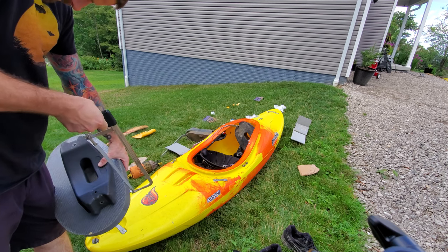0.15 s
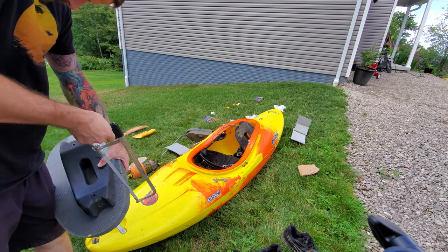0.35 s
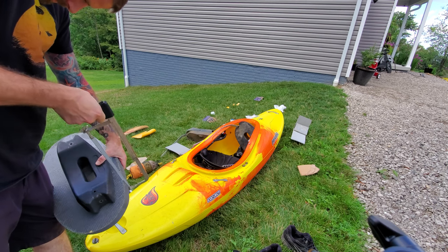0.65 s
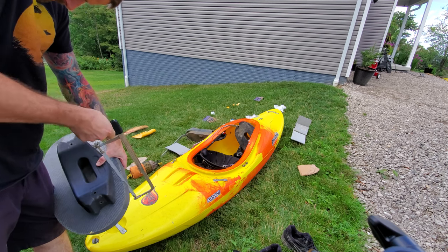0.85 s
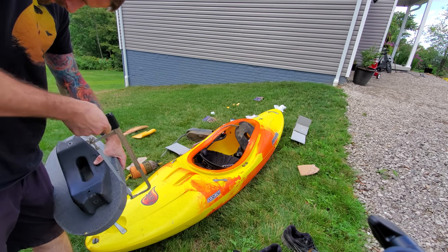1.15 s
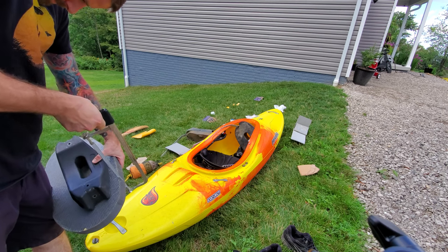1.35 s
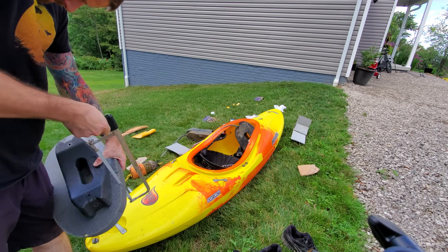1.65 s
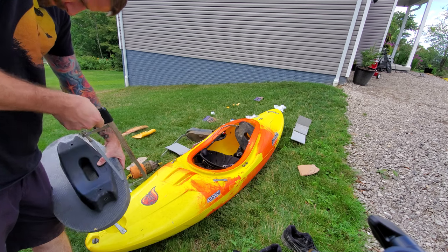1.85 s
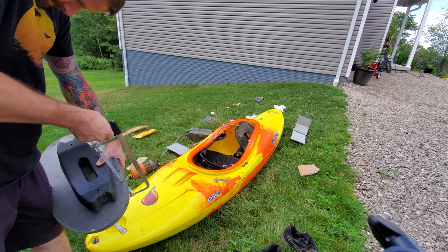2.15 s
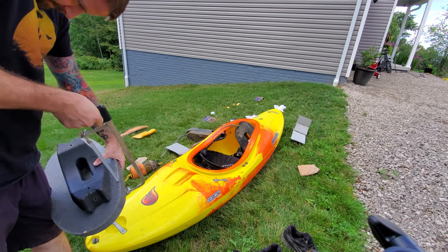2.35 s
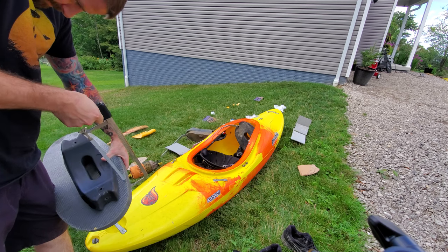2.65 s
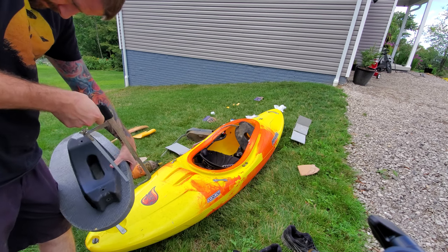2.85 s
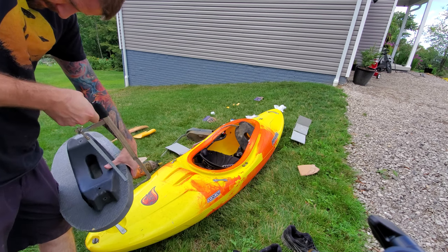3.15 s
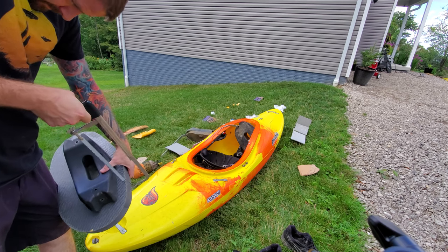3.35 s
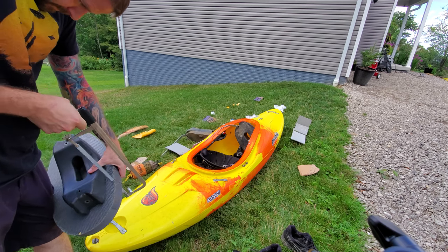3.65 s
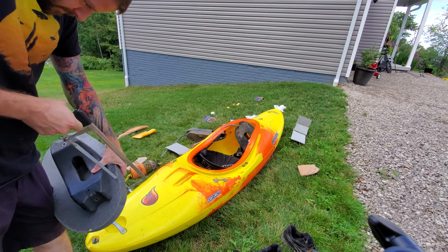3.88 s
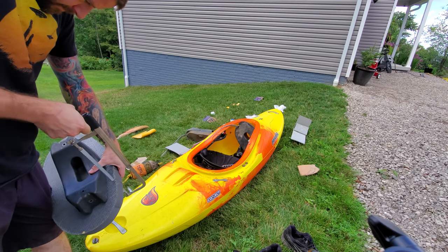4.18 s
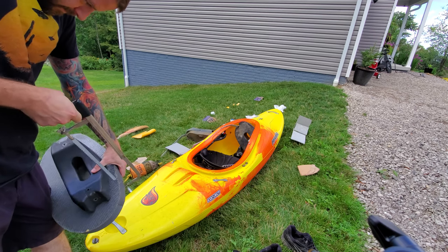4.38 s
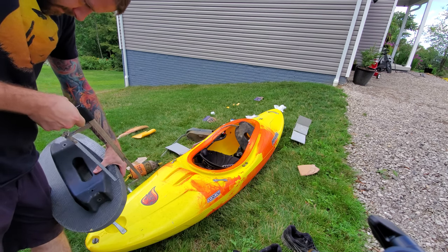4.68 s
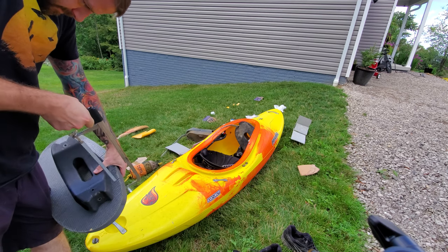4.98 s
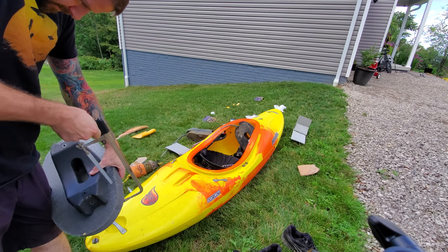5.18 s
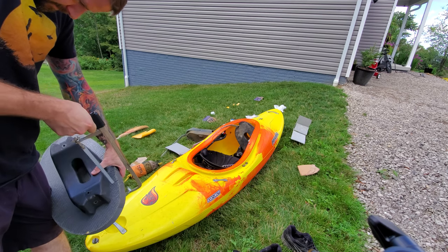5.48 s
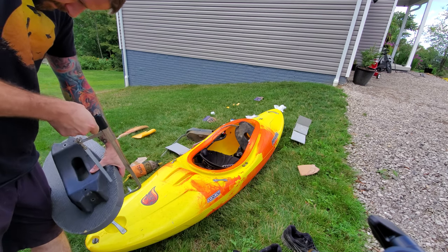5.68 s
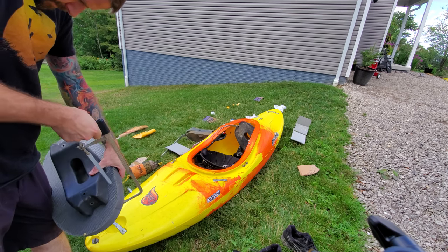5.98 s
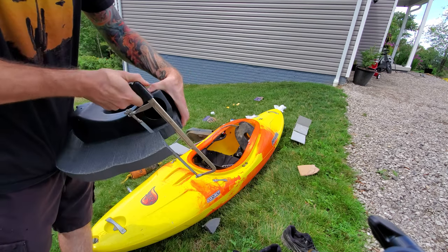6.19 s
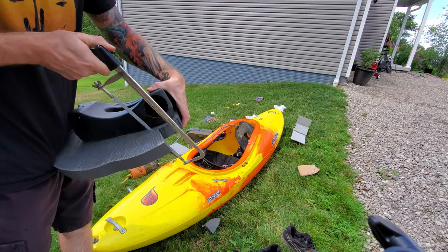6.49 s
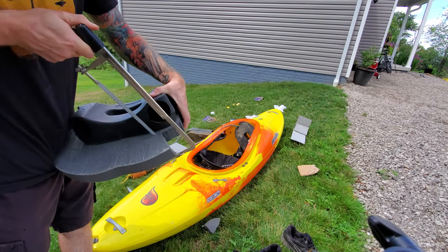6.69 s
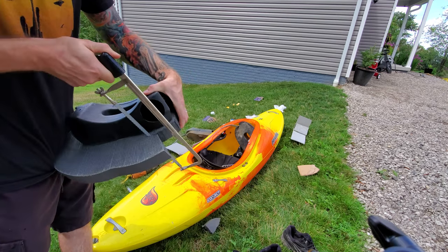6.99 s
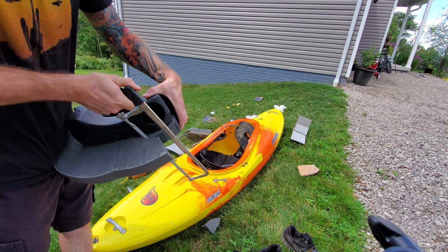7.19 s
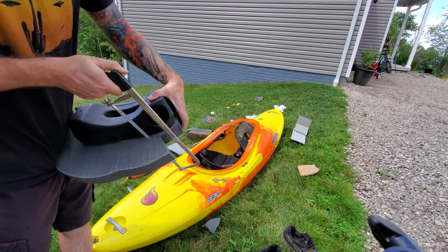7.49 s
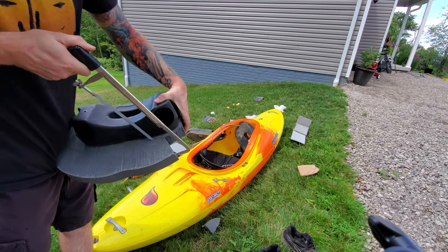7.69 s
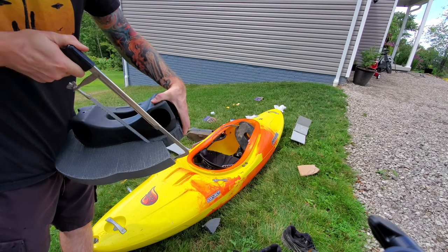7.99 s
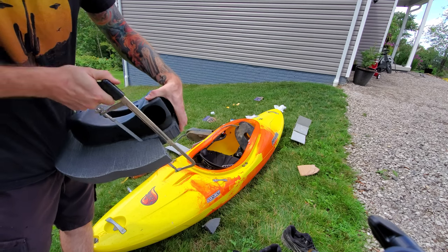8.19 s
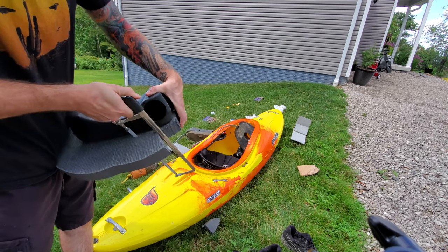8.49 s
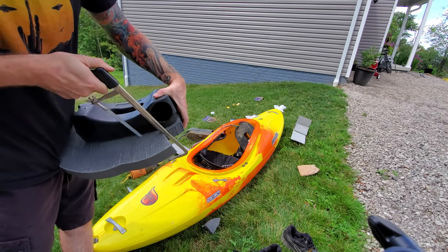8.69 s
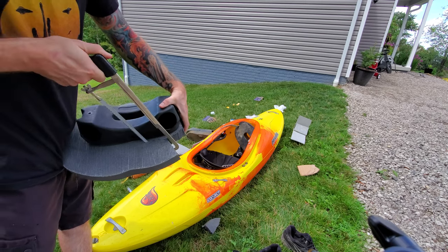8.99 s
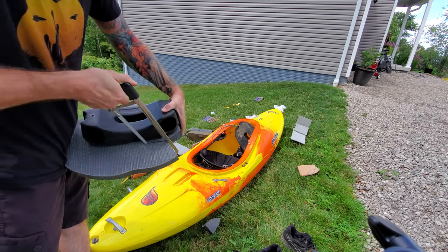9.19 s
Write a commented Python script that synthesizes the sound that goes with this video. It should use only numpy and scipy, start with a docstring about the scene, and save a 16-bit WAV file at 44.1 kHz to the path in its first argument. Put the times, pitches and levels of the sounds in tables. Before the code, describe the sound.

Outdoors, close by and a little to the left, a hacksaw rasps through hollow plastic in short, quick strokes that make the shell drum. It stops for about a second, then carries on with more hiss. The strokes turn uneven as the blade sticks, bringing sharp cracks, brief squeaks, short groans and a few dull thuds, and a hollow knock near the end. The air rumbles softly throughout.

```python
"""A hacksaw cuts a hollow plastic seat held in one hand, outdoors on a lawn.
Each tooth tears off a chip (a rasp) and plucks the shell (a drumming), faster mid-stroke and slower at
the turns. After a pause the cut goes on, deeper and hissier. Then the seat is turned, and the blade
jams, snaps free and squeaks while the seat groans and bumps. The open air rumbles softly underneath."""
import sys
import numpy as np
from scipy import signal
from scipy.io import wavfile

SR = 44100
rng = np.random.default_rng(int(sys.argv[2]) if len(sys.argv) > 2 else 0)


def generate_wav(signal):
    """Clip the signal to [-1, 1] and save it as 16-bit WAV at the path in sys.argv[1]."""
    frames = np.transpose(np.atleast_2d(signal))
    scaled = np.clip(frames, -1, 1) * 32767
    pcm = np.round(scaled).astype(np.int16)
    wavfile.write(sys.argv[1], SR, pcm)


N = 411894
FREQS = np.fft.rfftfreq(16384, 1 / SR)

# teeth that catch and break free: start_s, level_db, fade_s (time to die away by 60 dB)
SNAPS = [(0.289, -18, 0.01), (1.6125, -5, 0.0045), (2.017, -5.5, 0.006), (4.368, -19, 0.0036),
         (4.380, -3.5, 0.0031), (4.741, -12, 0.0031), (4.768, -5, 0.0081), (6.563, -16.5, 0.0057),
         (6.890, -13, 0.014), (7.002, -2.5, 0.0038), (7.0464, -2.5, 0.003), (7.1096, -1.5, 0.002),
         (7.147, -12.5, 0.0085), (7.185, -3.5, 0.013), (7.9255, -5, 0.0087), (8.012, -5, 0.0056),
         (8.060, -9, 0.0082), (8.1124, -8, 0.015), (8.133, -8.5, 0.01), (8.165, -4, 0.011),
         (8.1845, -6, 0.0091), (8.214, -6, 0.016), (8.23, -12, 0.0084), (8.255, -6.5, 0.0055),
         (8.277, -4.5, 0.014), (9.134, -17.5, 0.012), (9.196, -8, 0.022)]
# the shell's ringing notes, held three ways: pitch_hz, width_hz, level_db
SHELL_FIRST = [(337.4, 37, -0.5), (417.4, 23.3, 7), (507, 22.6, 8.5), (672, 43, 0.5), (916, 270, -5.5),
               (1494, 570, -9.5)]
SHELL_SECOND = [(419, 25, 2.5), (503.5, 45, 7), (685, 24, -7.5), (900, 160, -7), (1480, 340, -9)]
SHELL_TURNED = [(405.7, 52, 6.5), (1166, 94, 0), (1740, 430, -5.5)]
# tone of the rasp in a shallow and a deep cut: frequency_hz, level_db
RASP_SHALLOW = [(200, -30), (600, -5), (1650, 1), (2200, -2), (3200, 0), (6400, 0), (7700, -8),
                (10000, -4.5), (13000, .5)]
RASP_DEEP = [(200, -30), (600, -9.5), (1600, -5), (2300, -7), (3400, 3), (4700, -1.5), (6400, -.7),
             (7700, -11), (10000, -7), (13500, -1.5)]


def amp(db):
    return 10 ** (np.asarray(db) / 20)


def unit(x):
    return x / np.sqrt(np.mean(x ** 2) + 1e-20)


def add(mix, start_s, sound):
    part = mix[:, max(round(start_s * SR), 0):][:, :sound.shape[-1]]
    part += sound[..., :part.shape[1]]


def spectrum(points):
    """Join (frequency_hz, level_db) points into a gain for every frequency."""
    hz, db = np.transpose(points)
    return amp(np.interp(np.log(FREQS + 1), np.log(hz), db))


def colour(x, gain):
    """Shape the tone of x with a filter that rings only after it is struck."""
    log_gain = np.log(np.maximum(np.r_[gain, gain[-2:0:-1]], 1e-5))
    taps = np.fft.ifft(np.exp(np.conj(signal.hilbert(log_gain)))).real[:len(gain)]
    return signal.fftconvolve(x, taps / np.linalg.norm(taps))


def wander(n, hz):
    """A random wobble of size about 1 that changes hz times a second."""
    at = np.arange(n) * hz / SR
    return unit(np.interp(at, np.arange(n), rng.standard_normal(n)))


def burst(fade_s):
    """Noise that starts at once and dies away by 60 dB in fade_s."""
    t = np.arange(SR // 4) / SR
    return rng.standard_normal(len(t)) * amp(-60 * t / fade_s)


def air(swell_db=-3.0):
    """Open air: a low rumble, much alike on both sides, under a faint hiss that is not."""
    # tone of the air: frequency_hz, level_db
    tone = [(20, -26), (55, 6), (120, 1), (170, -8.5), (330, -22.5), (2500, -34.5), (3600, -29),
            (6500, -29), (8500, -36.5)]
    # loudness of the air: time_s, level_db
    loudness = [(5, -57.5), (8, -50.5)]
    common, left, right = rng.standard_normal((3, N))
    low_pass = signal.butter(1, 350, fs=SR)
    pair = [own + .7 * signal.lfilter(*low_pass, common - own) for own in (left, right)]
    level_db = np.interp(np.arange(N) / SR, *np.transpose(loudness)) + swell_db * wander(N, 8)
    return amp(level_db) * np.array([unit(colour(x, spectrum(tone))[:N]) for x in pair])


def shell_gain(shell, low_hz=290, high_hz=2000, drift=.04):
    """The shell's ringing notes, shifted a little by the grip each time; it is too small for bass."""
    shifts = 1 + drift * rng.standard_normal(len(shell))
    power = sum(amp(db) ** 2 / (1 + (2 * (FREQS - hz * shift) / width) ** 2)
                for (hz, width, db), shift in zip(shell, shifts))
    return np.sqrt(power / (1 + (low_hz / (FREQS + 1)) ** 16) / (1 + (FREQS / high_hz) ** 6))


def stroke(row, shell, rasp, run_in_s, fastest, drum_db, run_out_s=.057, crawl_hz=320.2, flex_hz=810,
           lurch=.05, slip=.42, smooth_db=-6, flex_db=-5, teeth_db=-14, octave_db=-17, zip_db=-3.5,
           catch_db=14.5, catches_per_s=60, speed_db=4):
    """One pass of the blade: each tooth tears a chip and plucks the shell."""
    start_s, length_s, tooth_hz, force_db, build_db, even = row
    n = int(length_s * SR)
    progress = np.arange(n) / n
    # the teeth bite only while they move; a stuck blade breaks loose at once
    if any(abs(snap_s - start_s) < .025 for snap_s, *_ in SNAPS):
        run_in_s = .012
    ramp = length_s * np.minimum(progress / run_in_s, (1 - progress) / run_out_s)
    moving = np.sin(np.pi / 2 * np.minimum(ramp, 1))
    push = moving * amp(force_db + build_db * (progress - .5))
    judder = unit(amp(1.5 * wander(n, 178.3)))
    # the arm speeds up and slows down; uneven tearing smears the teeth's note into noise
    swing = np.sin(np.pi * np.interp(progress, [0, fastest, 1], [0, .5, 1])) ** 3
    rate_hz = crawl_hz + (tooth_hz - crawl_hz) * swing
    jitter = 1 + lurch * wander(n, 35) + slip * (1 - even) * wander(n, 900)
    teeth_passed = np.cumsum(rate_hz * jitter) / SR
    note = np.cos(2 * np.pi * teeth_passed) + amp(octave_db) * np.cos(4 * np.pi * teeth_passed)
    teeth = unit(note * amp(2 * wander(n, 400.3)))
    grit = unit(amp(1.5 * wander(n, 1800)) * (0.8 + np.exp(-(teeth_passed % 1) / 0.28)))
    chips, left, right = grit * rng.standard_normal((3, n))
    # single chips crack off louder than the rest
    chips = chips + amp(catch_db) * rng.exponential(1, n) * (rng.random(n) < catches_per_s / SR)
    # teeth that ride cleanly pluck the shell less; it flutters in the grip
    flutter = unit(amp(1.7 * wander(n, 58.6)))
    pluck = push * moving * amp(drum_db + smooth_db * even) * flutter
    # the shell booms when the tooth rate sweeps through one of its notes
    drum = colour((amp(teeth_db) * even * teeth + chips) * pluck * judder, shell_gain(shell))
    drum *= np.linalg.norm(pluck) / np.linalg.norm(drum)
    # the seat's wall bends with the teeth late in a slow stroke; the blade zips at full speed
    flex = amp(drum_db + flex_db) * even * (progress / fastest) ** 2 * moving
    flex /= 1 + (tooth_hz / flex_hz) ** 8
    drum[:n] += (flex + amp(zip_db) * swing ** 3) * even * teeth * push * judder
    # no two strokes rasp quite alike
    rasp_gain = spectrum(rasp) * amp(2 * wander(len(FREQS), 290.7))
    swell = push * moving * judder * amp(speed_db * even * (swing - .5))
    # chips tear all along the cut, so left and right share only part of the hiss
    return drum + np.array([colour(unit(chips + own) * swell, rasp_gain) for own in (left, right)])


def snap(db, fade_s, cycles=95):
    """A tooth breaks free with a crack and a crumble; the quicker the break, the brighter it is."""
    # tone of cracking plastic: frequency_hz, level_db
    tone = [(180, -28), (450, -4), (1150, -4), (1900, -8.5), (3000, 6.5), (5000, -5.5), (6500, 2),
            (8000, -6.5), (14000, -3.5)]
    blow = burst(fade_s)
    blow[0] = 3  # the opening crack
    return amp(db) * colour(blow / 2, spectrum(tone) / np.hypot(1, FREQS * fade_s / cycles))


def slide(length_s, db, uneven_db=2):
    """The blade glides in the slot without biting: a faint hiss."""
    n = int(length_s * SR)
    rub = rng.standard_normal((2, n)) * amp(db + uneven_db * wander(n, 36)) * np.sqrt(np.hanning(n))
    return np.array([colour(x, spectrum(RASP_DEEP)) for x in rub])


def tick(db, fade_s=.048):
    """The blade touches the side of the slot."""
    return amp(db) * colour(burst(fade_s), spectrum(RASP_DEEP))


def squeak(db, fall_octaves, length_s=.028, end_hz=2910, octave_db=-5, chatter_db=3):
    """The pinched blade sticks and slips; the pitch falls as it slows."""
    n = int(length_s * SR)
    hz = end_hz * 2 ** np.linspace(fall_octaves, 0, n) * (1 + .12 * wander(n, 2000))
    phase = 2 * np.pi * np.cumsum(hz) / SR
    grab = np.sqrt(np.hanning(n)) * unit(amp(chatter_db * wander(n, 480)))
    return amp(db) * grab * (np.sin(phase) + amp(octave_db) * np.sin(2 * phase))


def bumps():
    """The seat bends and bumps in the hand: dull thuds, alike on both sides."""
    # thuds of the seat: start_s, level_db, fade_s
    thuds = [(6.261, -42.5, 0.82), (7.056, -28.5, 0.35), (7.197, -33.5, 0.69), (7.279, -36, 0.59)]
    # tone of a thud: frequency_hz, level_db
    tone = [(30, -1), (70, 9), (135, 10.5), (200, 1.5), (400, 5), (700, -15.5), (6000, -37)]
    out = np.zeros((2, N))
    for start_s, db, fade_s in thuds:
        add(out, start_s, amp(db) * colour(burst(fade_s), spectrum(tone)))
    return out


def groan(hz, db, length_s=.045, waver=.022):
    """The blade sticks and slips in step with the seat's wall: a short, swelling hoot."""
    n = int(length_s * SR)
    phase = 2 * np.pi * np.cumsum(hz * (1 + waver * wander(n, hz))) / SR
    return amp(db) * np.hanning(n) * np.sin(phase)


def knock(db, shell, fade_s=.13):
    """The saw hits the hollow shell and makes it ring."""
    return amp(db) * colour(burst(fade_s), shell_gain(shell))


def echoes(pair, fade_s, low_hz):
    """A dying spray of echoes above low_hz, different on each side."""
    high_pass = signal.butter(2, low_hz, "high", fs=SR)
    tails = [signal.lfilter(*high_pass, burst(fade_s)) for _ in pair]
    return np.array([signal.fftconvolve(x, tail / np.linalg.norm(tail))[:N]
                     for x, tail in zip(pair, tails)])


def yard(pair, near_db=-8, wall_db=-31, left_db=3, right_db=-1, right_delay_s=.0002):
    """The saw is to the left; nearby things scatter its sound and the house wall answers faintly."""
    late_right = np.r_[np.zeros(round(right_delay_s * SR)), pair[1]][:N]
    direct = np.array([pair[0], late_right])
    near = amp(near_db) * echoes(pair, fade_s=.068, low_hz=463)
    wall = amp(wall_db) * echoes(pair, fade_s=.35, low_hz=200)
    return (direct + near + wall) * amp([[left_db], [right_db]])


def sawing():
    """All the sounds of the saw, for one hold on the seat after another."""
    # passes of the blade: start_s, length_s, top_tooth_rate_hz, middle_force_db, force_build_db,
    # evenness (0 tears at random, 1 rides cleanly and zips)
    strokes = [(0.02, 0.17, 1000, -42.5, -13, 0.55), (0.17, 0.16, 900, -37.5, 32, 0.16),
               (0.450, 0.15, 1304, -38.5, -2, 0.72), (0.639, 0.15, 1000, -36, 19, .35),
               (0.854, 0.16, 1321, -39.5, -10, 0.77), (1.029, 0.15, 1057, -35, 8.5, 0.34),
               (1.248, 0.21, 675, -42.5, 0.5, 0.94), (1.523, 0.13, 1091, -33.5, -5, 0.37),
               (1.722, 0.15, 1315, -38.5, -6, 0.81), (1.937, 0.14, 1000, -33.5, -4, 0.35),
               (2.275, 0.135, 999, -40.5, 4.5, 0.65), (3.462, 0.24, 650, -35, 2, 0.084),
               (3.795, 0.16, 851.6, -39.5, -9.5, 0.45), (4.009, 0.14, 900, -32, 17, 0.26),
               (4.190, 0.14, 1120, -32.5, 9, 0.67), (4.363, 0.13, 902, -30.5, 16.5, 0.33),
               (4.521, 0.15, 950, -34.5, 7, 0.38), (4.73, 0.12, 899, -29, 21.5, 0.13),
               (4.905, 0.14, 949, -37.5, -7, 0.37), (5.057, 0.15, 950, -30.5, 17, 0.48),
               (5.253, 0.14, 903, -38, -1, 0.34), (5.428, 0.19, 843, -32, -18, 0.32),
               (5.65, 0.14, 907, -39.5, 0, 0.4), (5.84, 0.15, 867, -33.5, -14, 0.3),
               (6.294, 0.19, 1153, -34, 2, 0.69), (6.556, 0.13, 1350, -29, 19, 0.8),
               (6.874, 0.365, 593, -32, 0.5, 0.23), (7.439, 0.17, 1805, -29, 12, 0.66),
               (7.575, 0.2, 956, -32.5, 3, 0.47), (7.878, 0.465, 650, -33, 8, .15),
               (8.45, 0.22, 1200, -35.3, 4, .88), (8.738, 0.17, 1390, -36.5, -15.5, 0.46),
               (9.127, 0.15, 1200, -36, -14, 0.36), (9.305, 0.12, 878, -22.5, -2.5, 0.12)]
    # the blade gliding: start_s, length_s, level_db
    slides = [(2.1, 0.13, -61.5), (2.99, 0.2, -58), (8.33, 0.16, -59)]
    # light touches of the blade: start_s, level_db
    ticks = [(2.168, -47), (2.699, -46), (4.690, -44.5), (5.420, -32.5), (5.838, -45), (6.12, -41),
             (6.508, -47), (7.279, -43)]
    # the cut pinching the blade: start_s, level_db, fall_octaves
    squeaks = [(4.608, -29, 0.42), (5.16, -24.5, 0.3), (5.555, -27.5, 0.68), (5.936, -30, 1.26),
               (6.433, -30, 1.85), (6.636, -26, 0.71), (7.186, -24, 0.58), (7.532, -24.5, 0.31),
               (7.712, -29.5, 1.56), (8.286, -16, 0.29)]
    # the blade jamming: start_s, pitch_hz, level_db
    groans = [(6.307, 417, -30.5), (6.425, 424, -23.5), (6.552, 453, -30), (7.583, 376, -22.5),
              (7.995, 391, -26.5)]
    # the saw hitting the shell: start_s, level_db
    knocks = [(9.03, -45), (9.197, -23.5), (9.238, -36)]
    # holds on the seat: start_s, shell table, rasp table, run_in_s,
    # fastest point (share of the stroke), drum_db (drumming over the rasp)
    holds = [(0, SHELL_FIRST, RASP_SHALLOW, .07, .52, 3), (2.45, SHELL_SECOND, RASP_DEEP, .07, .5, -3.7),
             (6.05, SHELL_TURNED, RASP_DEEP, .04, .43, -.7), (8.4, SHELL_TURNED, RASP_DEEP, .04, .42, -3),
             (8.95, SHELL_FIRST, RASP_DEEP, .04, .4, -1)]
    events = (slides, slide), (SNAPS, snap), (ticks, tick), (squeaks, squeak), (groans, groan)
    ends = [hold[0] for hold in holds[1:]] + [np.inf]
    out = np.zeros((2, N))
    for (begin, shell, *settings), end in zip(holds, ends):
        cut = np.zeros((2, N))
        for row in strokes:
            start_s, length_s = row[:2]
            if begin <= start_s + length_s / 2 < end:
                add(cut, start_s, stroke(row, shell, *settings))
        for table, sound in events:
            for start_s, *shape in table:
                if begin <= start_s < end:
                    add(cut, start_s, sound(*shape))
        for start_s, db in knocks:
            if begin <= start_s < end:
                add(cut, start_s, knock(db, shell))
        out += yard(cut)
    return out


def scene():
    return sawing() + bumps() + air()


def record(dry):
    """Cut off the very highest treble."""
    low_pass = signal.firwin(511, 16100, window=("kaiser", 9), fs=SR)
    return signal.oaconvolve(dry, low_pass[None], "same")


dry = scene()
out = record(dry)
generate_wav(out)
```